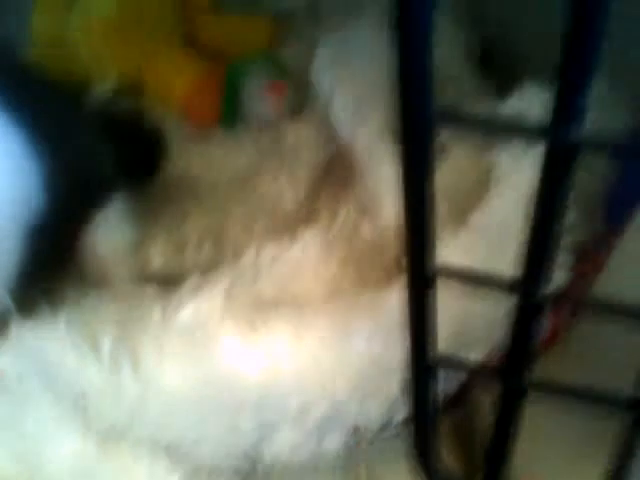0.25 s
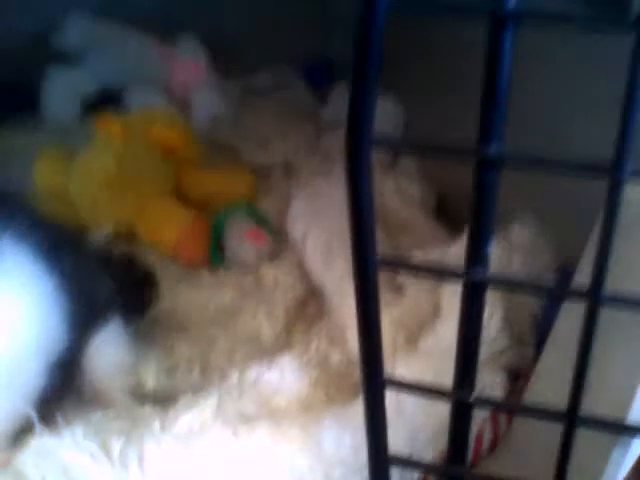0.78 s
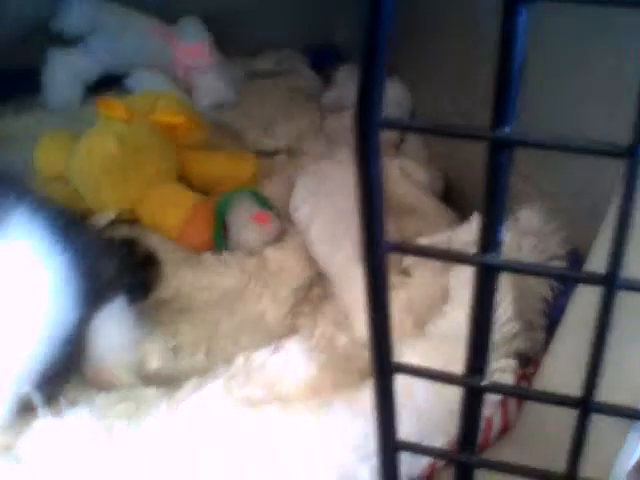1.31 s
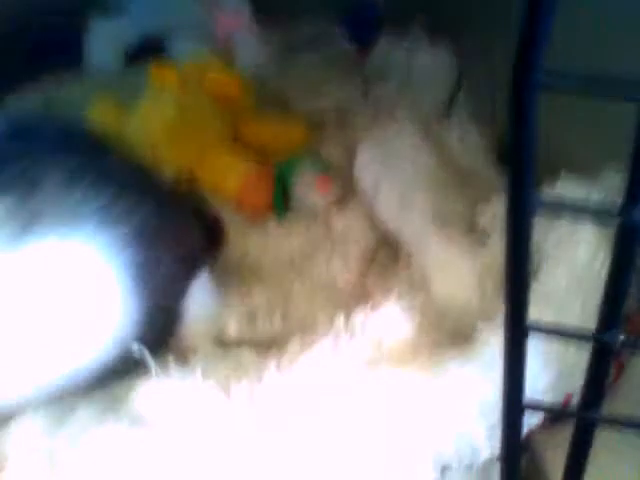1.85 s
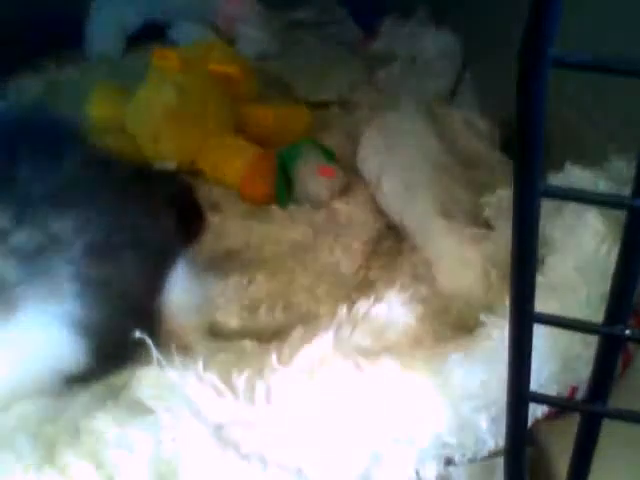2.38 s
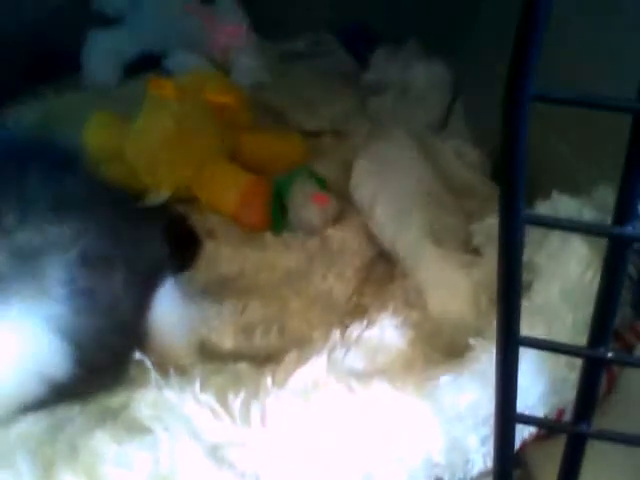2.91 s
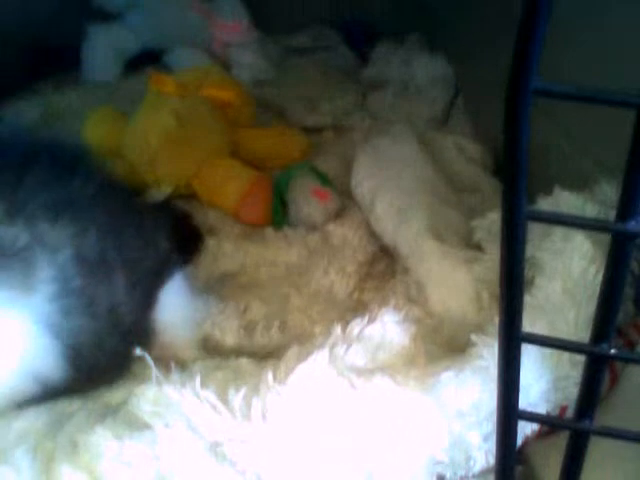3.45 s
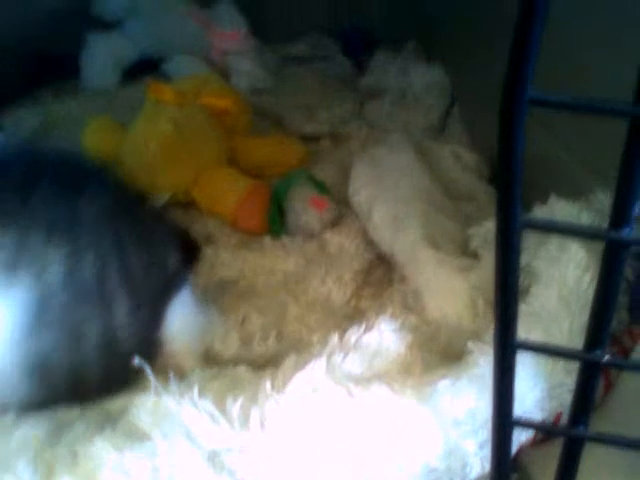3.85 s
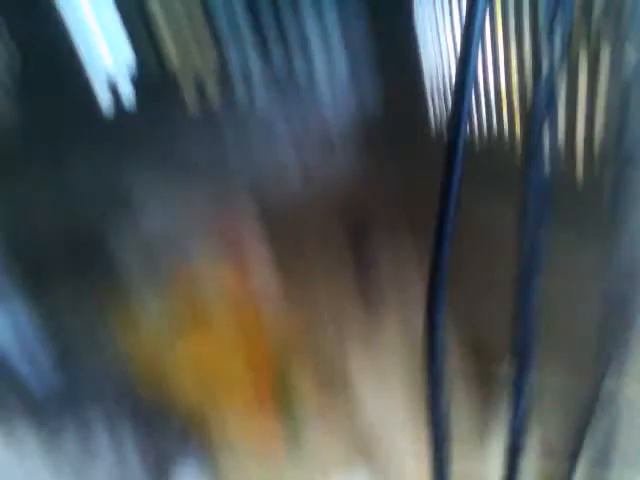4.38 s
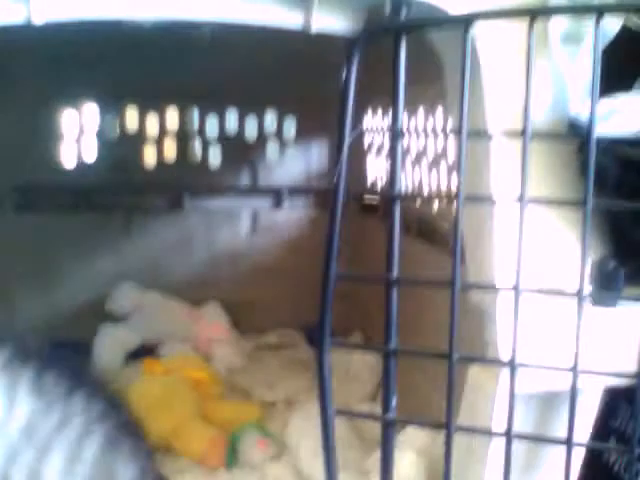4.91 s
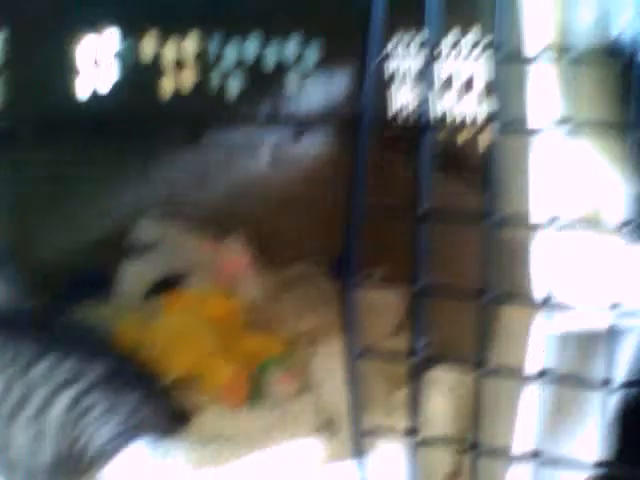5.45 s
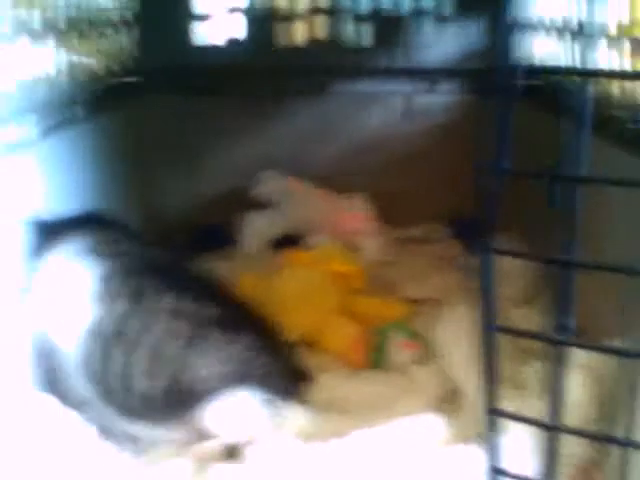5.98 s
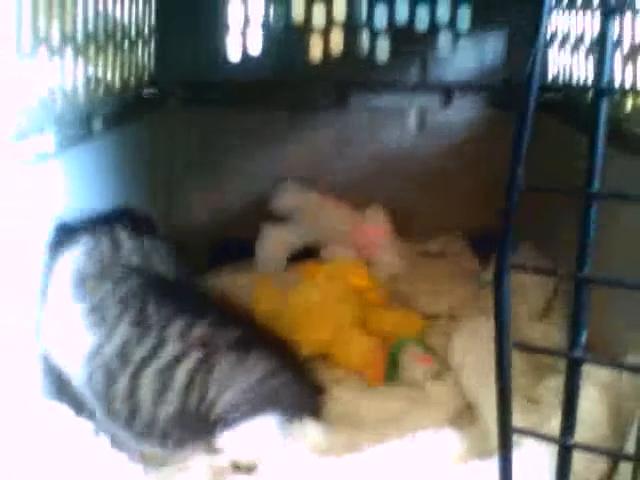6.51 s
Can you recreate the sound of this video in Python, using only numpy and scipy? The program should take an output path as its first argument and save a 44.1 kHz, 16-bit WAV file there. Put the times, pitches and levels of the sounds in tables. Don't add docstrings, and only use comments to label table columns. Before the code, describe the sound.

A kitten's claws tick and scrape on a hollow plastic carrier while fleece rubs and a hand-held microphone bumps, over a low hum.

```python
import sys
import numpy as np
from scipy import signal
from scipy.fft import rfft, irfft, next_fast_len
from scipy.io import wavfile
from scipy.ndimage import uniform_filter1d

SR = 44100
rng = np.random.default_rng(int(sys.argv[2]) if len(sys.argv) > 2 else 0)


def transcribe(u):
    v = np.clip(np.atleast_2d(u).T, -1, 1)
    q = np.round(v * 32767).astype(np.int16)
    wavfile.write(sys.argv[1], SR, q)


def amplitude_ratio(level_db):
    exponent = np.asarray(level_db, float) / 20
    return 10 ** exponent


N = 295911

# (pitch [Hz], level [dB], t60 [s])
LOW_MODES = [(438, -1.5, 0.018), (621, -3.5, 0.016), (898, 2, 0.012), (1222, -6.5, 0.036), (1550, 3, 0.013)]
MID_MODES = [(1842, 2, 0.022), (2075, -7, 0.045), (2180, 9.5, 0.011), (2514, 10, 0.0075), (3402, 5, 0.014),
             (3920, 6.5, 0.011), (4467, 5, 0.012)]
HIGH_MODES = [(5160, -2, 0.0068), (5637, 4, 0.0069), (6296, -6, 0.0095), (7080, -2, 0.0065),
              (8020, 2.5, 0.0067), (9080, -2, 0.0052), (9950, -6, 0.0054), (11000, -17.5, 0.0076),
              (12150, -17, 0.0058), (13700, -21.5, 0.007)]


def level(x, db=0):
    return x * amplitude_ratio(db) / np.sqrt(np.mean(x ** 2))


def add(out, s, x):
    i = int(s * SR)
    out[i:i + len(x)] += x[:N - i]


def band(x, lo_hz, hi_hz):
    return signal.sosfilt(signal.butter(2, [lo_hz, hi_hz], "band", fs=SR, output="sos"), x)


def colour(x, points):
    hz, db = np.transpose(points)
    size = next_fast_len(N)
    bins_hz = np.arange(size // 2 + 1) * SR / size
    gain = amplitude_ratio(np.interp(np.log(bins_hz + 1), np.log(hz), db))
    return irfft(rfft(x, size) * gain, size)[:N]


def walk(rate_hz):
    hold = int(SR / rate_hz)
    steps = np.repeat(rng.standard_normal(N // hold + 1), hold)
    return 1.3 * uniform_filter1d(uniform_filter1d(steps, hold), hold)[:N]


def peak_filter(x, hz, width_hz):
    return signal.lfilter(*signal.iirpeak(hz, hz / width_hz, SR), x)


def resonate(x, modes, wander_db=0.0, rate_hz=5.0):
    out = np.zeros(N)
    for k, (hz, width_hz, db) in enumerate(modes):
        gain = amplitude_ratio(db + wander_db * walk(rate_hz))
        out += (-1) ** k * gain * peak_filter(x, hz, width_hz)
    return out


def swells(start_s, hold_s, layers_db, rest_db, rise_db_s, fall_db_s):
    t = np.arange(0, N + 64, 64) / SR
    start, end = start_s[:, None], (start_s + hold_s)[:, None]
    away_db = rise_db_s * np.maximum(start - t, 0) + fall_db_s * np.maximum(t - end, 0)
    power = amplitude_ratio(-2 * away_db)
    gains = []
    for db, rest in zip(layers_db, rest_db):
        gain = np.sqrt(amplitude_ratio(2 * db) @ power + amplitude_ratio(2 * rest))
        gains.append(np.interp(np.arange(N) / SR, t, gain))
    return gains


def ring(modes, chance, rise_s):
    t = np.arange(2600) / SR
    hz, db, t60_s = np.transpose(modes)[:, :, None]
    size_db, tune, phase = chance[:, :len(modes), None] * np.array([1.5, 0.012, 3])[:, None, None]
    decay = amplitude_ratio(db + size_db - 60 * t / t60_s)
    y = np.sum(decay * np.sin(2 * np.pi * hz * (1 + tune) * t + phase), axis=0)
    y = y * (1 - np.exp(-(t / rise_s) ** 2))
    return y / np.abs(y).max()


def ticks():
    # (time [s], peak of middle modes [dB], high modes [dB], low modes [dB], after-scrape [dB])
    slips = [(0.0584, -39.5, 8, -1, -9.5), (0.1642, -3, -6.5, -4, -29.5), (0.2734, -38.5, -2, 17.5, -22.5),
             (2.389, -24, -6, 13.5, -33.5), (2.9116, -48, 9, -12, -15), (4.256, -13.5, 13, -9, -27),
             (4.33, -10.5, -17, -7, -35), (4.3586, -27.5, -18, 5.5, -22), (4.4454, -31, -19, -17, -30),
             (4.58, -21, -5, -9, -22), (5.5752, -16, -1, -3, -30), (5.672, -11, 8.5, -2.5, -35),
             (5.8773, -12, 8.5, -4, -31), (6.416, -26.5, -18, 12.5, -58)]
    drags = [(0.0702, -20.5, 19.5, 7.5, -36), (0.0761, -10.5, -8, -4.5, -49), (0.1685, -24.5, -18, 20, -61),
             (0.631, -13.5, 15.5, -6, -34), (0.649, -8.5, 4.5, -35, -33), (2.936, -6.5, 4, -34, -29),
             (4.022, -4, 4.5, -25.5, -29), (4.0465, -24, -36, -29, -10), (4.4906, -44, 7, -17, -32),
             (5.3834, -18.5, 3.5, -3.5, -33), (6.6185, -13, 9, -7, -31)]
    pricks = [(0.2528, -16.5, 7, 2.5, -23), (0.3134, -32, -7, -8, -25), (0.3535, -42, 17, -15, -26),
              (0.3922, -49, 14, 11, -34), (0.4248, -25.5, 1, -7, -17), (0.4439, -39, 5, 1, -16),
              (0.626, -31, -5, 11, -21.5), (0.681, -24, -6, -9, -23), (1.9804, -38, -24, 20, -28),
              (1.9962, -40.5, 7, 15.5, -23), (2.3742, -31.5, 8, 12.5, -23), (2.383, -38, 7, -15, 1),
              (2.568, -28.5, -11, -17.5, -10), (2.7552, -29.5, 7, 1, -21), (2.82, -44, -2, -15, -28),
              (2.8543, -34, -25.5, -24, 0), (4.1881, -16.5, -22, -8, -36), (5.4774, -15, 4.5, -4.5, -29),
              (5.4955, -17.5, -16, 3.5, -27.5), (5.5639, -15, 9, -1, -33), (5.7355, -21, -7, 0, -37),
              (5.7788, -16.5, 9, -1, -26.5), (5.9954, -31.5, -8, 14, -24)]
    rim_ticks = [
        (2.0012, -10.5, 5, -14, -26.5),
        (2.0786, -22, -7, -17, -43),
        (2.236, -13.5, -1, -47, -35),
        (6.2651, -19, -1, -34, -38),
    ]
    pad_taps = [
        (0.748, -14.5, -46, -8.5, -31),
        (1.4286, -14.5, -45, -15.5, -27),
    ]
    # (pitch [Hz], level [dB], t60 [s])
    rim_modes = [(2394, 7, 0.016), (2900, 1, 0.013), (3470, 1, 0.015), (3970, 3.5, 0.013), (4930, 1, 0.01)]
    floor_modes = [(1160, 1, 0.012), (1810, 5.5, 0.016), (2270, 4.5, .01), (2750, 1, 0.007),
                   (3450, 2.5, 0.0094), (4230, -5, .008)]
    slip_s, drag_s, prick_s = 0.033, 0.055, 0.023
    kinds = [(drags, drag_s, MID_MODES), (slips, slip_s, MID_MODES), (pricks, prick_s, MID_MODES),
             (rim_ticks, slip_s, rim_modes), (pad_taps, slip_s, floor_modes)]
    claws = [(*row, scrape_s, modes) for table, scrape_s, modes in kinds for row in table]
    claws.sort(key=lambda claw: claw[0])
    chances = rng.standard_normal((len(claws), 3, 3, 10))
    out, scrape = np.zeros(N), np.zeros((4, N))
    for (s, db, high_db, low_db, scrape_db, scrape_s, modes), chance in zip(claws, chances):
        add(out, s, amplitude_ratio(db) * ring(modes, chance[0], 0.00061))
        add(out, s, amplitude_ratio(db + high_db) * ring(HIGH_MODES, chance[1], 0.00035))
        add(out, s + 0.0008, amplitude_ratio(db + low_db) * ring(LOW_MODES, chance[2], 0.0012))
        t = np.arange(int(3 * scrape_s * SR)) / SR
        layers = [(-0.3 * low_db - 9.5, 0.91), (1.69 * high_db - 14.5, 1.0),
                  (0.95 * high_db - 4.5, 0.48), (0.96 * low_db + 12.0, 0.73)]
        for row, (rel_db, share) in zip(scrape, layers):
            u = t / (share * scrape_s)
            add(row, s, amplitude_ratio(db + scrape_db + rel_db - 4.0 * u) / (1 + u ** 6))
    return out, scrape


def fibres(modes, lo_hz, hi_hz, grains, ring_db, damping, wander_db):
    # (frequency [Hz], density [dB per Hz])
    rub_colour = [(150, -25), (250, 4.5), (622, 5), (768, -4), (2050, -7.5), (2700, -14.5), (2960, -13),
                  (3990, -18.5), (5570, -11.5), (9420, -11), (11800, -29.5), (14900, -28.5), (16500, -91)]
    direct, rung = rng.standard_normal((2, N)) * grains
    damped = [(hz, damping / t60_s, 0.5 * db) for hz, db, t60_s in modes]
    shell = resonate(rung, damped, wander_db)
    x = band(colour(level(direct) + level(shell, ring_db), rub_colour), lo_hz, hi_hz)
    steady = x / np.sqrt(uniform_filter1d(x ** 2, size=SR // 6) + 1e-12)
    return steady * amplitude_ratio(0.46 * walk(22.02))


def lean(x, split_hz, axis):
    # (time [s], lean of rasp to upper modes [dB], lean of hiss [dB])
    contact = [(.1, -2, -6), (.21, 16, -6), (.3, -15, -1), (.75, -2, 2), (1.5, -3, -14), (1.65, 4, 3),
               (1.9, -2, 6), (2.0, 16, 11), (2.221, 18, 2.5), (2.4, -5, -5), (2.58, 21, -5), (2.74, -1, -2),
               (4.3, -7.5, -14), (4.7, 3.5, 3), (5.1, 5, -8), (5.75, -1.5, 12.5), (6.1, -7, -13),
               (6.45, -10.5, 8)]
    db = np.interp(np.arange(N) / SR, *np.transpose(contact)[[0, axis]]) / 2
    low = signal.sosfiltfilt(signal.butter(2, split_hz, fs=SR, output="sos"), x)
    return amplitude_ratio(-db) * low + amplitude_ratio(db) * (x - low)


def rubbing(scrape):
    # (start [s], hold [s], scrape [dB], brightness [dB], weight on the shell [dB])
    strokes = [(0.098, 0.06, -43.5, -1, -18), (0.179, 0.032, -40.5, -25, 2.5), (0.29, 0.067, -62, 1, 16),
               (0.441, 0.051, -57.5, 0, 6), (0.654, 0.17, -49.5, -12.5, 1.5), (1.008, 0.02, -53.5, -12, -6),
               (1.453, 0.16, -50.5, -9, 8), (1.577, 0.14, -30, -8.5, -5), (1.719, 0.14, -28.5, -7, -3),
               (2.02, 0.098, -50, 2, -2), (2.174, 0.094, -45, 0.5, -17), (2.395, 0.0034, -41.5, 1, 6.5),
               (2.609, 0.13, -41.5, -1.5, -16), (2.852, .02, -53.5, 0.5, -12), (4.203, 0.042, -52.5, -3, 6),
               (4.302, 0.058, -33.5, -4, -9), (4.422, 0.246, -33.5, -7, -4.5), (4.689, 0.25, -29, -8, -8.5),
               (5.171, 0.26, -54, 0.5, 3), (5.506, 0.16, -41, -10, -5), (5.679, 0.23, -33, -10, -5.5),
               (5.992, 0.036, -37.5, -13.5, 4), (6.072, 0.1, -34, -11, -5), (6.191, 0.23, -42.5, -13.5, -4)]
    # rasp, hiss, fizz, body [dB]
    rest_db = [-61, -69.5, -71, -61]
    clumps = np.minimum(rng.exponential(size=N // 44 + 1), 5)
    grains = np.repeat(amplitude_ratio(1.8 * clumps), 44)[:N]
    start_s, hold_s, db, bright_db, weight_db = np.transpose(strokes)
    layers_db = db, db + bright_db, db - 4 + 1.61 * bright_db, db + weight_db
    rasp, hiss, fizz, body = swells(start_s, hold_s, layers_db, rest_db, rise_db_s=272, fall_db_s=225)
    low, mid, high = list(LOW_MODES), list(MID_MODES), list(HIGH_MODES)
    wall_hz, rim_hz = 2040, 4700
    out = rasp * lean(fibres(low[3:] + mid[:4], 1060, 3030, grains, -7.5, 8.8, 4.0), wall_hz, axis=1)
    out += hiss * lean(fibres(mid[5:] + high[:3], 3070, 6430, grains, 2.0, 9.9, 3.2), rim_hz, axis=2)
    out += fizz * fibres(high[3:8], 8900, 17000, grains, -1.1, 9.6, 1.0)
    out += body * fibres(low[:3], 305, 1150, grains * amplitude_ratio(3.6 * walk(30)), -3.0, 3.7, 1.67)
    out += scrape[0] * fibres(mid[1:2], 1700, 2500, grains, 12, 7.0, 1.5)
    out += scrape[1] * fibres(mid[4:] + high[:2], 3200, 6300, grains, 3.0, 7.0, 2.0)
    out += scrape[2] * fibres(high[4:5], 6600, 16500, grains, 5.0, 9.0, 1.5)
    out += scrape[3] * fibres(low + mid[3:5], 500, 5520, grains, -4.5, 4.0, 0.82)
    return out - 0.31 * peak_filter(out, hz=6660, width_hz=650)


def patches():
    # (start [s], hold [s], pitch [Hz], width [Hz],
    # level [dB])
    singing = [(.171, .055, 2900, 1100, -41), (.3535, .011, 5200, 2000, -50), (1.551, .17, 4050, 400, -42),
               (1.6, .022, 480, 156, -34), (1.659, .16, 8000, 300, -49), (1.661, .091, 1530, 200, -37),
               (1.701, .13, 7000, 400, -48), (1.7025, .11, 2620, 180, -37), (1.704, .21, 3970, 300, -43),
               (1.742, .11, 2084, 150, -36), (1.791, .044, 443, 151, -39), (1.899, .08, 2060, 150, -50),
               (2.139, .16, 2320, 380, -44), (2.171, .046, 4370, 400, -49), (2.174, .1, 1660, 150, -52),
               (2.177, .1, 5600, 300, -57), (2.562, .07, 2180, 500, -43), (2.602, .13, 4700, 900, -48),
               (2.611, .14, 8200, 700, -48), (2.613, .14, 9500, 900, -51.5), (2.622, .13, 1670, 150, -47),
               (2.668, .017, 1050, 120, -47), (2.943, .018, 7800, 600, -46), (2.945, .057, 2110, 220, -44),
               (4.029, .055, 2105, 200, -43), (4.034, .05, 4500, 1510, -52), (4.641, .25, 5500, 900, -42),
               (4.698, .19, 3950, 400, -41), (4.702, .21, 1310, 150, -40.5), (4.703, .3, 486, 180, -43),
               (4.719, .17, 7440, 400, -47.5), (4.755, .14, 2080, 100, -41), (5.581, .08, 2550, 500, -49),
               (5.781, .15, 1550, 200, -40), (5.811, .038, 445, 80, -33), (6.078, .092, 6600, 700, -52),
               (6.092, .02, 500, 250, -34), (6.328, .04, 3820, 900, -56),
               (.18, 0.045, 2100, 600, -45), (.26, .06, 396, 160, -36.5), (.353, .01, 9200, 2000, -50),
               (.424, .005, 5500, 2970, -47), (.44, .07, 5700, 600, -62), (2.53, 0.033, 5500, 500, -56),
               (2.855, 0.01, 2100, 800, -42), (2.6, 0.045, 8100, 400, -61), (3.585, .04, 1190, 300, -58),
               (4.027, .021, 7950, 350, -45), (4.03, 0.1, 364, 140.4, -46), (4.76, 0.13, 6600, 2376, -61),
               (5.0, 0.024, 1800, 1200, -50), (5.095, .05, 1200, 400, -53), (5.51, 0.059, 260, 90, -36),
               (5.69, 0.19, 4190, 2200, -45), (5.997, 0.01, 2260, 592.6, -37), (6.441, .05, 8100, 300, -67),
               (6.623, 0.017, 8200, 1600, -48.5)]
    rise_db_s, fall_db_s = 1800, 500
    rows, edge = singing, SR // 20
    t = np.arange(-edge, 7 * edge) / SR
    clumps = rng.exponential(size=(len(rows), len(t) // 160 + 1))
    clumps = np.repeat(clumps, 160, axis=1)[:, :len(t)]
    noises = rng.standard_normal(clumps.shape) * amplitude_ratio(2.8 * np.minimum(clumps, 2.5))
    out = np.zeros(N)
    for (s, hold_s, hz, width_hz, db), noise in zip(rows, noises):
        sung = level(peak_filter(peak_filter(noise, hz, width_hz), hz, width_hz), db)
        touch_db = rise_db_s * np.minimum(t, 0) - fall_db_s * np.maximum(t - hold_s, 0)
        add(out, s - edge / SR, sung * amplitude_ratio(touch_db))
    return out


def grazes():
    # (time [s], pitch [Hz], peak [dB], t60 [s])
    touches = [(.046, 4100, -50, .012), (.078, 800, -27, 0.017), (0.166, 2750, -11, .015),
               (.167, 672, -11, 0.018), (.257, 353, -17.5, .05), (.2738, 2900, -34, .012),
               (.392, 8600, -34, .008), (0.4244, 1700, -28, 0.036), (0.648, 2280, -14.5, 0.019),
               (1.429, 1430, -26, 0.01), (1.507, 1200, -33, .02), (1.893, 3980, -30, .015),
               (1.905, 4000, -26, 0.014), (1.981, 944, -23.5, 0.045), (2.375, 592, -16, 0.038),
               (2.391, 1204, -22, 0.042), (2.57, 5200, -32, 0.015), (2.756, 9900, -29, .008),
               (2.819, 5370, -37, .012), (2.911, 9200, -40, .01), (4.03, 404, -31, 0.022),
               (4.492, 10500, -28, 0.0074), (5.495, 3060, -19.5, 0.013), (5.497, 326, -22, 0.03),
               (5.551, 2340, -25, .015), (5.715, 11500, -45.5, .006), (5.736, 6000, -31, .008),
               (5.791, 7000, -30, .008), (5.996, 863, -12.5, 0.014), (6.095, 412, -21, 0.043),
               (6.2655, 2110, -15.5, 0.013), (6.348, 6430, -37, 0.013), (6.437, 8100, -46, .01),
               (6.448, 6500, -46, .01), (6.619, 927, -26.5, 0.052)]
    out = np.zeros(N)
    for (s, hz, db, t60_s), chance in zip(touches, rng.standard_normal((len(touches), 3, 2))):
        pair = [(hz, 0, t60_s), (1.113 * hz, -6, 0.58 * t60_s)]
        add(out, s, amplitude_ratio(db) * ring(pair, chance, 1.16 / hz))
    return out


def bumps():
    # (time [s], peak [dB], pitch [Hz], casing knock above it [dB])
    firm = [(0.286, -10.5, 94, -10), (0.488, -26, 113, -13), (0.628, -20.5, 77, -4), (0.708, -9, 71, -33),
            (1.611, -36, 120, 9.5), (1.851, -17, 91, -11.5), (2.243, -18.5, 87, -11.5),
            (2.388, -14, 148, -2.5), (2.79, -50, 110, -9), (3.38, -22.5, 113, -19),
            (3.692, -24.5, 119, -13), (4.231, -9, 141, -33), (4.311, -20, 112, -10), (4.646, -25, 94.5, -7),
            (5.175, -28, 105, -11), (5.494, -10.5, 131, 0), (5.56, -19, 106, -6), (5.79, -26.5, 137, 6),
            (5.991, -11.5, 78.5, 1.5), (6.041, -20, 68, -5), (6.108, -22, 110, 2), (6.255, -17.5, 99, -14),
            (6.48, -22, 104, 0), (2.82, -28, 89, -5)]
    # (time [s], peak [dB], pitch [Hz], casing knock above it [dB])
    loose = [(0.064, -12.5, 131.5, -3.5), (0.166, -20, 116, 2), (0.251, -2.5, 108.2, -11),
             (0.745, -17.5, 104, -23), (1.7, -27, 120, -18), (2.061, -18, 114, -16.5),
             (2.421, -18, 84, -16), (3.545, -23.5, 118, -20.5), (3.785, -20.5, 110, -18),
             (3.853, -25, 120, -13), (4.257, -9.5, 121, -4.5), (5.665, -19.5, 111, -9.5),
             (5.845, -21, 132, 1), (6.087, -13.5, 98.5, -6), (6.335, -18, 92, -24), (6.42, -12, 97, 0),
             (6.63, -22, 115, -5.5)]
    firm_t60_s, loose_t60_s = 0.06, 0.13
    blows = [(*row, firm_t60_s) for row in firm] + [(*row, loose_t60_s) for row in loose]
    blows.sort()
    out, t = np.zeros(N), np.arange(SR // 3) / SR
    for (s, db, hz, knock_db, t60_s), tune in zip(blows, rng.standard_normal(len(blows))):
        turn = 2 * np.pi * hz * t * (1 + 0.15 * np.exp(-t / 0.019))
        low = np.sin(turn) * amplitude_ratio(-60 * t / t60_s) * (1 - np.exp(-(t / 0.004) ** 2))
        knock = np.sin(2 * np.pi * 270 * (1 + 0.237 * tune) * t)
        knock = knock * amplitude_ratio(-60 * t / 0.065) * (1 - np.exp(-t / 0.00051))
        blow = low / np.abs(low).max() + amplitude_ratio(knock_db) * knock / np.abs(knock).max()
        add(out, s, -amplitude_ratio(db) * blow)
    return out


def pushes():
    # (middle [s], length [s], level [dB], direction [sign])
    shoves = [
        (0.337, 0.082, -18, -1),
        (0.743, 0.043, -11, -1),
        (2.798, 0.038, -22, 1),
        (4.326, 0.024, -10.5, -1),
        (4.365, 0.044, -23, 1),
        (4.657, 0.024, -20, 1),
        (6.263, 0.041, -14.5, -1),
        (6.35, 0.049, -19, 1),
    ]
    out = np.zeros(N)
    for s, length_s, db, way in shoves:
        u = np.arange(-int(length_s * SR), int(3 * length_s * SR)) / (length_s * SR)
        shove = np.exp(-(u / 0.38) ** 2) - 0.23 * np.exp(-(u - 1) ** 2)
        add(out, s - length_s, np.sign(way) * amplitude_ratio(db) * shove)
    return out


def shaking():
    # (start [s], hold [s], tremor [dB], sway [dB])
    jostles = [(0.064, 0.019, -23, -21.5), (0.138, 0.027, -23.5, -21.5), (0.264, 0.088, -25, -18.5),
               (0.377, 0.11, -32, -48), (0.471, 0.052, -35, -23.5), (0.709, 0.072, -26, -16),
               (0.98, 0.021, -33.5, -32), (1.4, 0.051, -40.5, -40), (1.625, .03, -41, -49),
               (1.727, 0.028, -32, -42), (1.818, 0.11, -36.5, -36), (2.089, 0.03, -31, -26.5),
               (2.378, 0.1, -43, -26), (2.781, 0.052, -37, -26.5), (2.984, 0.039, -56, -37),
               (3.572, 0.025, -37.5, -31), (3.695, 0.13, -36, -39), (3.984, 0.041, -36.5, -57),
               (4.182, .05, -36, -39), (4.266, 0.098, -24.5, -16), (4.638, .02, -35, -29),
               (4.926, 0.046, -36, -42), (5.17, 0.052, -55, -38), (5.5, 0.067, -27, -21),
               (5.68, 0.019, -27.5, -21), (5.816, 0.13, -26.5, -25), (5.993, 0.13, -39, -19),
               (6.18, 0.081, -34.5, -41), (6.23, 0.23, -30, -26), (6.466, 0.31, -34, -33.5)]
    # (pitch [Hz], width [Hz], level [dB])
    hand_modes = [(61, 11.4, -7), (84.5, 24.3, -1), (127.7, 15.3, 2), (195.3, 21.7, -4), (292, 34, -13),
                  (347.4, 43, -18.5)]
    hum_db, still_sway_db = -39.5, -40
    rise_db_s, fall_db_s = 170, 178
    quicker = 1.43
    start_s, hold_s, tremor_db, sway_db = np.transpose(jostles)
    tremor, = swells(start_s, hold_s, [tremor_db], [hum_db], rise_db_s, fall_db_s)
    swing, = swells(start_s, hold_s / quicker, [sway_db], [still_sway_db],
                    quicker * rise_db_s, quicker * fall_db_s)
    rumble = resonate(rng.standard_normal(N) * amplitude_ratio(2.6 * walk(30)), hand_modes)
    sway = band(rng.standard_normal(N), 4.6, 38.8)
    return level(rumble) * tremor + level(sway) * swing


def room():
    # (frequency [Hz], density [dB per Hz])
    air_colour = [(180, -34), (300, -7), (405, -24.5), (478, -2), (519, -14.5), (1030, -10), (1750, -20.5),
                  (3130, -27), (8090, -27), (13300, -42.5), (16000, -76)]
    air = rng.standard_normal(N) * amplitude_ratio(0.92 * walk(2.5))
    return level(colour(air, air_colour), -55.5)


def scene():
    claws, scrape = ticks()
    contact = claws + rubbing(scrape) + patches() + grazes()
    handling = bumps() + pushes() + shaking()
    return (contact + handling + room())[None]


def top_cut(x):
    return signal.sosfilt(signal.butter(12, 16660, fs=SR, output="sos"), x)


def record(dry):
    mix = np.tanh(0.71 * dry) / 0.89
    return top_cut(mix)


dry = scene()
out = record(dry)
transcribe(out)
```